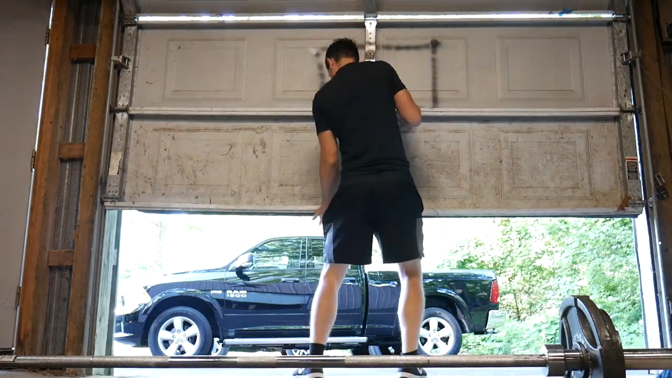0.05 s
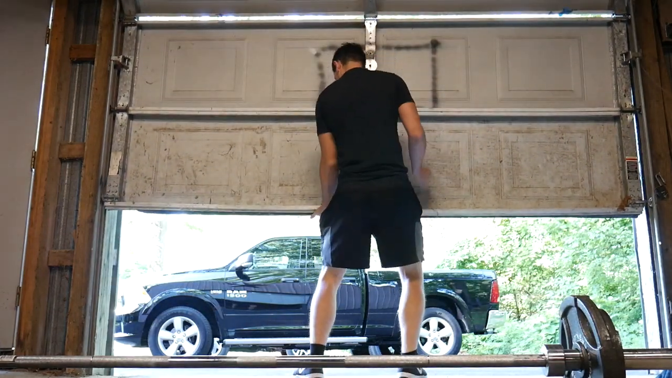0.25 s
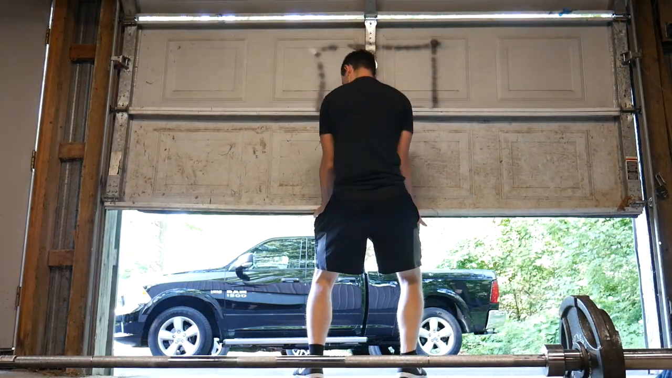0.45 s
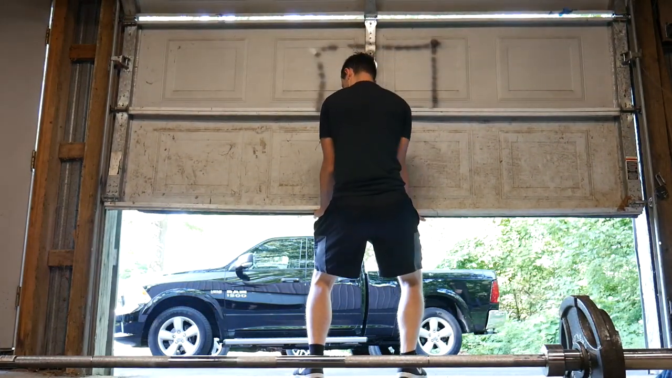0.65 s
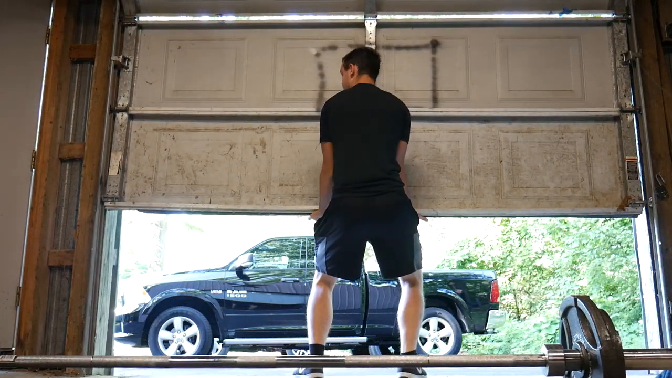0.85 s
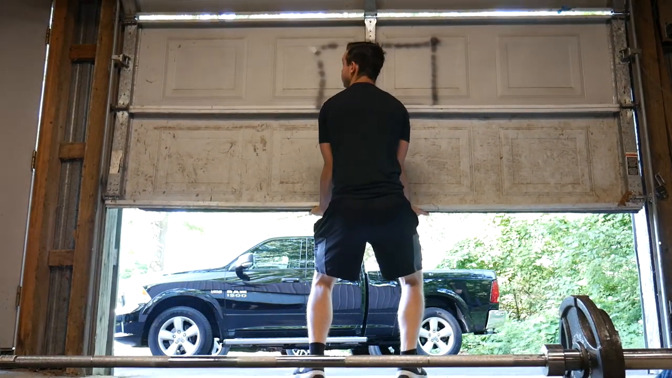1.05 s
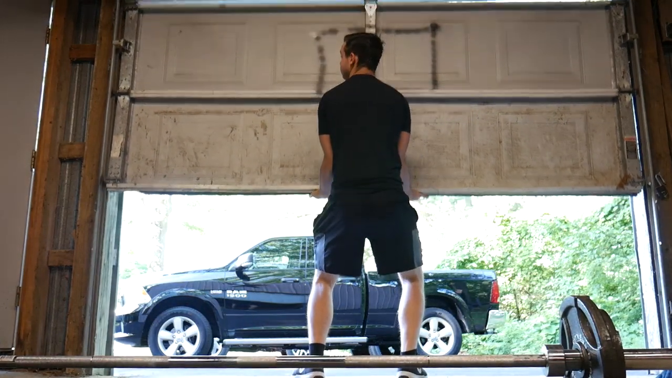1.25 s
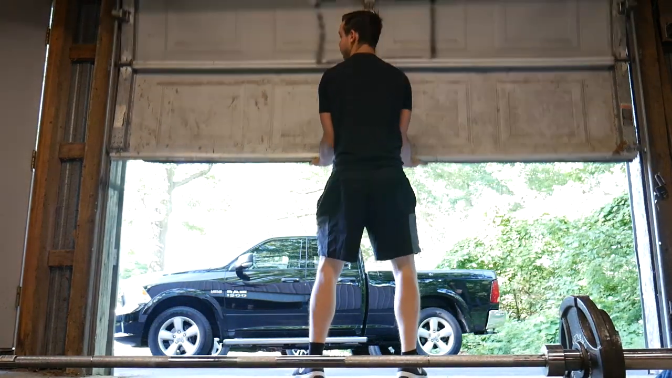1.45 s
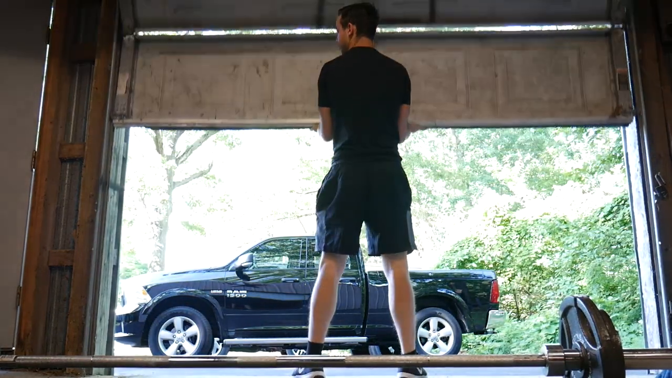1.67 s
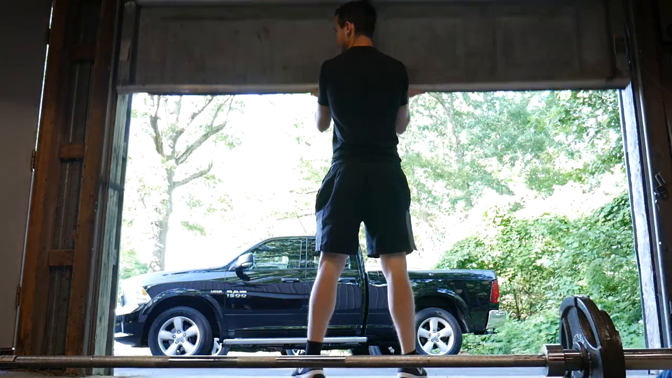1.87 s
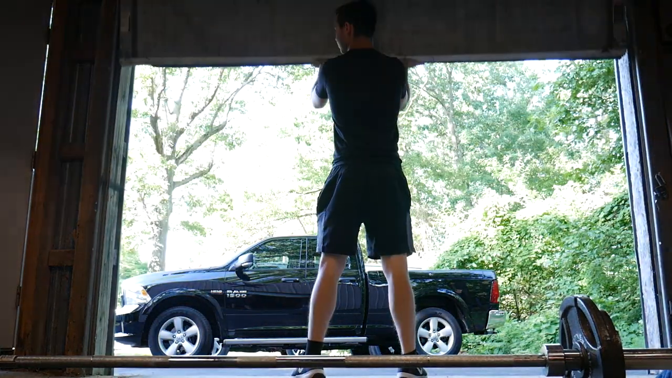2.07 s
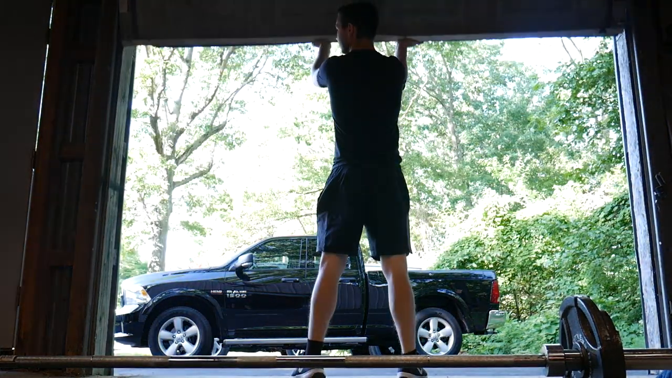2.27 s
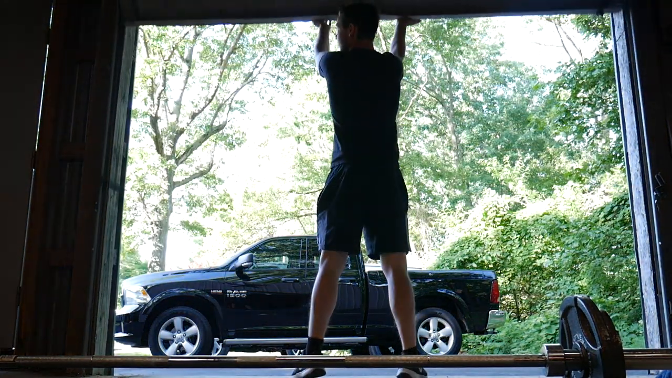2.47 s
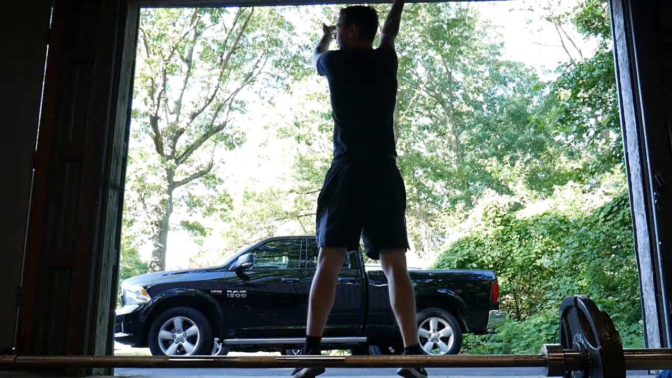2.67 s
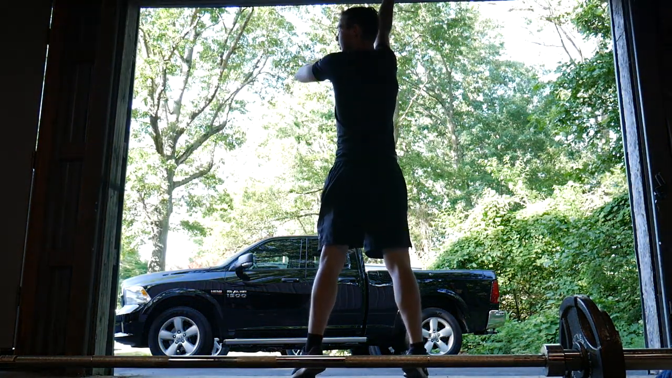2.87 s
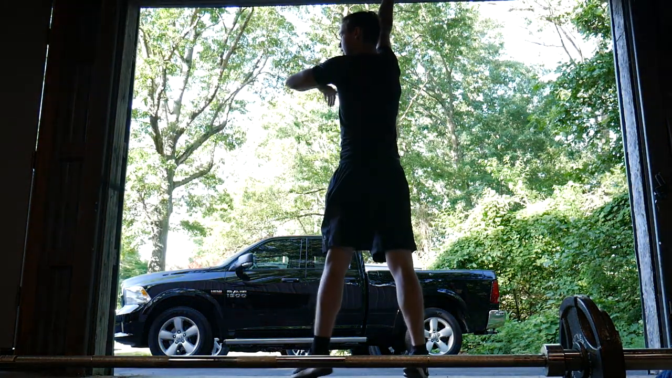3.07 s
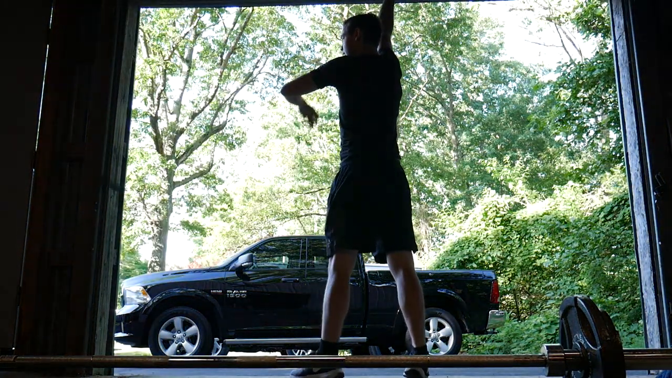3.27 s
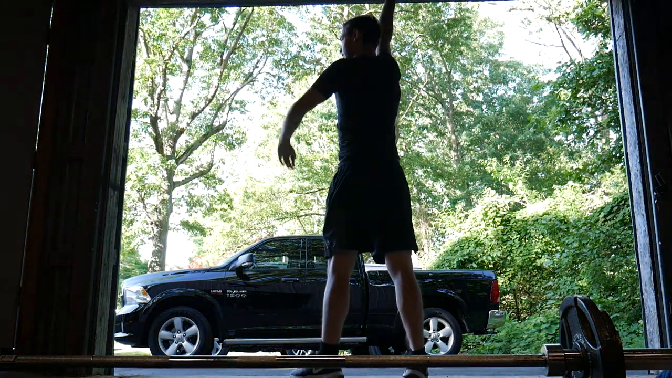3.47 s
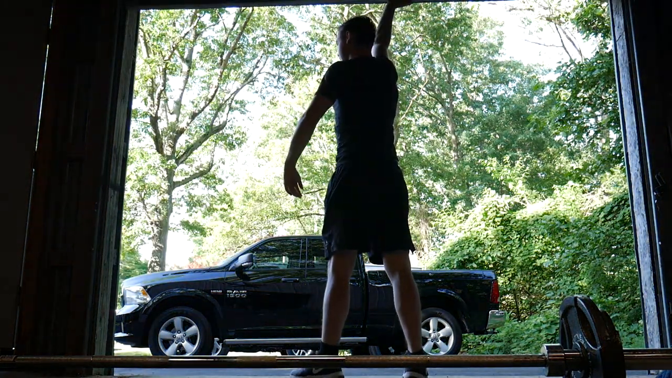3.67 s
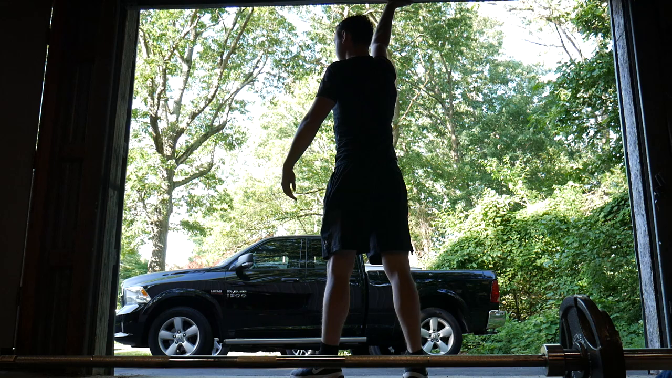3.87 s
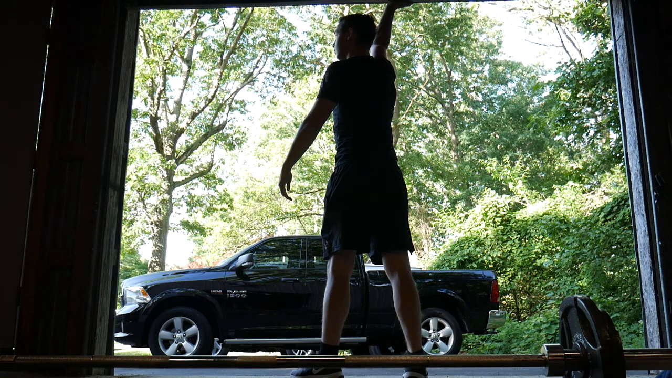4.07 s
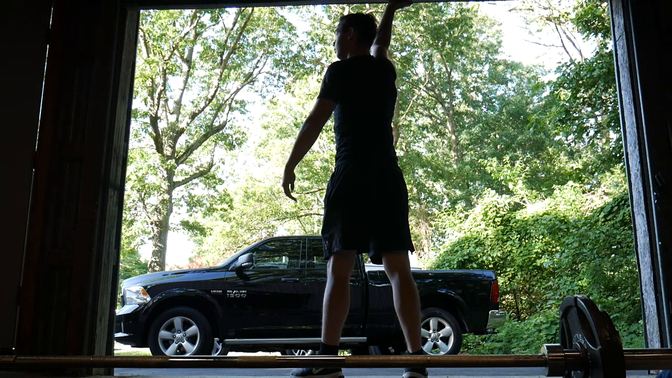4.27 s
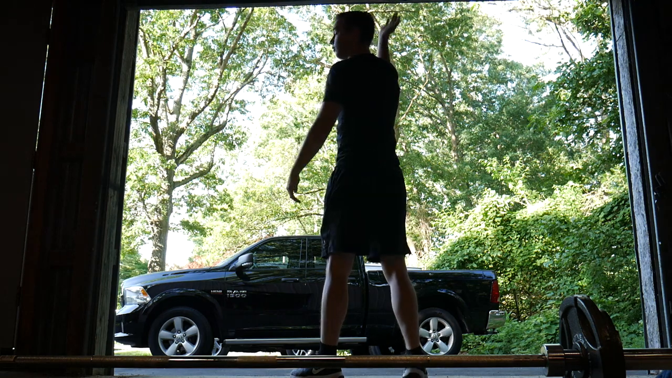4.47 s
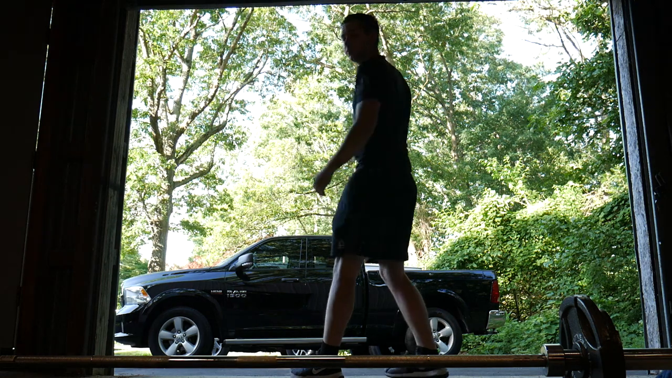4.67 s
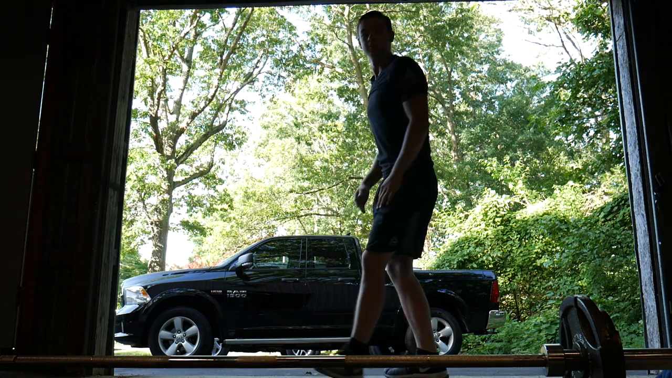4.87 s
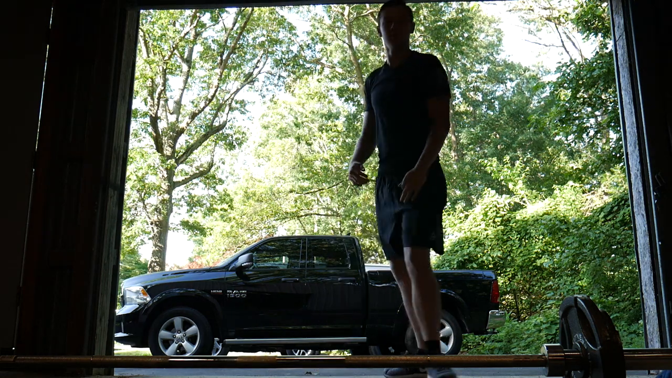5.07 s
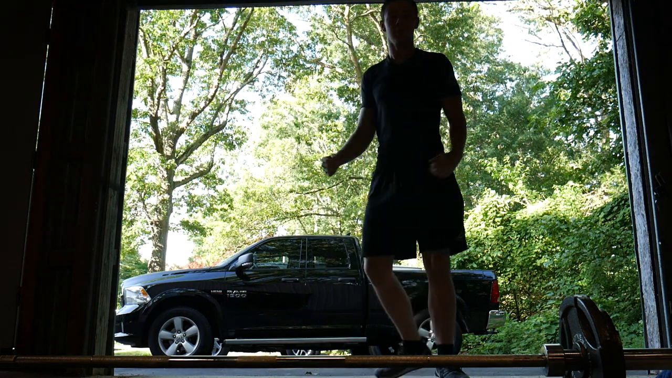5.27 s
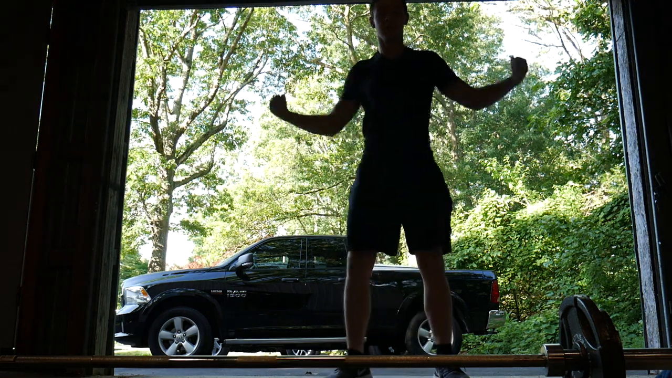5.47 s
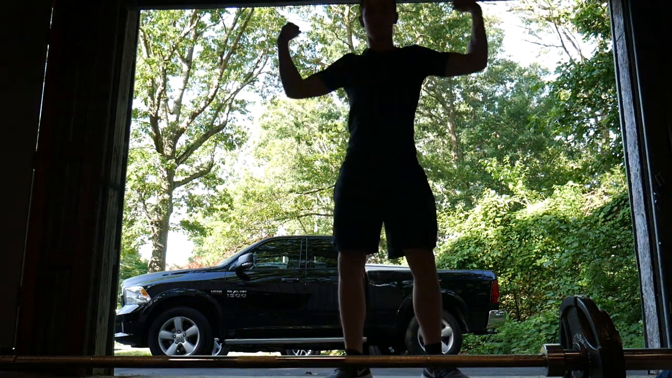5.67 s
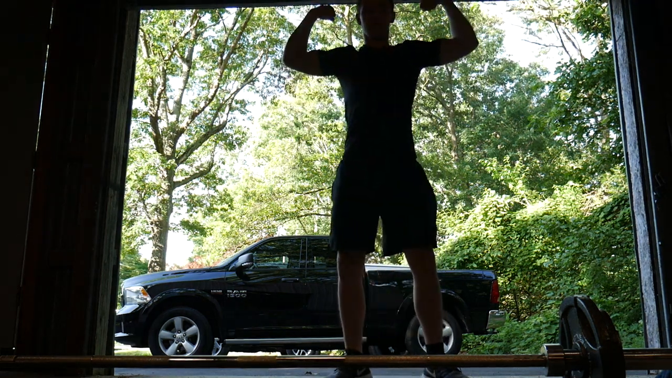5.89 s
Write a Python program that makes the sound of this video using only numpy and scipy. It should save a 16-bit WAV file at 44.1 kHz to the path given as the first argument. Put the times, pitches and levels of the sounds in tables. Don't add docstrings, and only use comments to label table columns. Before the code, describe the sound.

A steel sectional door is raised by hand in a bare, reverberant garage. From 0 to 1.1 s there are light rattles and small metallic clacks over a low, fading rumble. From about 1.2 s the rollers start hammering the tracks; the rumble grows, loudest around 1.5 to 2.1 s, with hard, bright hinge clacks at 1.5, 1.6, 1.8 to 1.9, 2.05, 2.2 and 2.55 s, the boom deepening as the panels swing overhead. At 2.75 s the door bangs its stop, and the bracket rings briefly. Softer bounces and ticks follow at 3.1 and 3.3 s, then dull panel thuds around 3.6 to 3.8 s with one last rocking rumble. It fades to faint outdoor hum by about 4.2 s. From 4.45 s tiny ticks lead into gritty shoe scuffs at 4.65, 5.2 and, strongest, 5.5 s, with dull heel thuds. The sound is close to mono, and the loudest peaks clip.

```python
import sys
import numpy as np
from scipy import signal
from scipy.fft import rfft, irfft, next_fast_len
from scipy.io import wavfile
from scipy.ndimage import uniform_filter1d

SR = 44100
rng = np.random.default_rng(int(sys.argv[2]) if len(sys.argv) > 2 else 0)


def invert_db(level):
    return 10 ** (np.asarray(level, dtype=float) / 20)


def transcribe(signal):
    frames = np.atleast_2d(signal).T
    limited = np.clip(frames, -1, 1)
    pcm = np.round(limited * 32767).astype(np.int16)
    wavfile.write(sys.argv[1], SR, pcm)


N = 261513
TIME = np.arange(N) / SR
SIZE = next_fast_len(N + SR)
HZ = np.arange(SIZE // 2 + 1) * SR / SIZE + 1e-3


def unit(x):
    return x / np.sqrt(np.mean(x ** 2))


def shape(points):
    hz, db = np.transpose(points)
    return invert_db(np.interp(np.log(HZ), np.log(hz), db))


def band(lo_hz, hi_hz):
    return np.sqrt(1 / (1 + (HZ / hi_hz) ** 6) - 1 / (1 + (HZ / lo_hz) ** 6) + 1e-12)


def humps(resonances):
    return invert_db(sum(db / (1 + (2 * (HZ - hz) / width) ** 2) for hz, width, db in resonances))


def colour(x, gain):
    return irfft(rfft(x, SIZE) * gain, SIZE)[:N]


def walk(rate):
    k = int(SR / rate)
    return uniform_filter1d(np.repeat(rng.standard_normal(N // k + 1), k), k)[:N]


def grit(per_s, spread_db):
    hit = rng.random(N) < per_s / SR
    size = np.minimum(rng.exponential(size=N), 3)
    return unit(hit * rng.standard_normal(N) * invert_db(spread_db * size))


def ring(x, hz, t60):
    radius = np.exp(-np.log(1000) / (t60 * SR))
    w = 2 * np.pi * hz / SR
    return signal.lfilter([np.sin(w)], [1, -2 * radius * np.cos(w), radius * radius], x)


def swell(s, length, rise):
    t = np.clip(TIME - s, 0, 1)
    return (1 - np.exp(-t / max(rise, 2e-4))) * np.exp(-(t / max(length, 1e-3)) ** 0.91)


def bursts(events, rises, drive, parts):
    power = np.zeros((3, N))
    for (s, db, body_db, edge_db, length), rise in zip(events, rises):
        levels = db - 7.0 + np.array([[body_db], [0], [edge_db]])
        power += (invert_db(levels) * swell(s, length, rise)) ** 2
    out = 0
    for p, part in zip(power, parts):
        out = out + colour(np.sqrt(p) * drive, part) / np.sqrt(np.mean(part ** 2))
    return out


def clacks(events, plate, ring_hz, ring_db):
    drive = grit(per_s=5000, spread_db=1.5)
    body = band(530, 1500) * shape([(500, -4), (900, -3.5), (1150, -4.5), (1500, -6)]) * plate
    middle = band(1550, 4020) * plate
    edge = band(6800, 16000) * shape([(5000, 10), (16000, -12.5)]) * plate
    blows = sum(swell(s, length, 0.00049) * invert_db(db + ring_db) for s, db, _, _, length in events)
    rung = ring(drive * blows, ring_hz, t60=0.01)
    return bursts(events, np.full(len(events), .0015), drive, (body, middle, edge)) + rung


# (frequency [Hz], t60 [s])
GARAGE_DECAY = [(150, 0.97), (500, 0.79), (1500, 0.41), (4000, 0.44), (9000, 0.2), (14000, 0.18)]


def garage(wet_db):
    t = np.arange(SR) / SR
    tail = 0
    hz = np.array(GARAGE_DECAY)[:, 0]
    edges = np.sqrt(hz[1:] * hz[:-1])
    for lo, hi, (_, t60) in zip([1, *edges], [*edges, SR], GARAGE_DECAY):
        fade = np.exp(-np.log(1000) * t / t60) * (1 - np.exp(-t / 0.0018))
        noise = rng.standard_normal(SR) * fade / np.sqrt(SR * 0.022)
        tail = tail + rfft(noise, SIZE) * band(lo, hi)
    tail = tail / np.sqrt(uniform_filter1d(np.abs(tail) ** 2, len(HZ) // 200))
    return (1 + invert_db(wet_db) * tail) / np.sqrt(1 + invert_db(2 * wet_db))


# (frequency [Hz], level [dB per Hz])
OUTDOOR_SPECTRUM = [(15, -25), (25, -13), (200, -9.5), (300, -1), (399, -10.5), (456, -8.5), (741, -17.5),
                    (969, -17), (1700, -20), (6370, -26), (10600, -34.5), (12500, -41), (15500, -33.5)]
OUTDOORS_DB = -53.5


def outdoors():
    noise = unit(colour(rng.standard_normal(N), shape(OUTDOOR_SPECTRUM)))
    return noise * invert_db(OUTDOORS_DB + 1.0 * walk(3.48))


# (time [s], level [dB], frequency [Hz])
HEEL_THUDS = [
    (4.65, -45, 343),
    (5.196, -46, 580),
    (5.199, -42, 250),
    (5.5, -42, 330),
]


def heels():
    out = 0
    for s, db, hz in HEEL_THUDS:
        t = np.clip(TIME - s, 0, 1)
        out = out + invert_db(db) * np.sin(2 * np.pi * hz * t) * t / 0.0015 * np.exp(-t / 0.005)
    return out


# (time [s], peak level [dB], frequency [Hz])
SMALL_TICKS = [(0.2785, -22.5, 2600), (1.509, -2.5, 4840), (1.8564, -16, 4660), (2.0424, -2, 5540),
               (2.209, -18, 4840), (2.38, -12.5, 9200), (2.3894, -25, 4570), (2.9288, -12, 4140),
               (3.0889, -18.5, 6860), (3.0887, -16, 5020), (3.1334, -18, 6790), (3.157, -24, 5220),
               (3.176, -26, 4440), (3.19, -23, 4640), (3.2036, -18, 7700), (3.5174, -27, 7570),
               (4.4333, -39, 5510), (4.441, -49, 4440), (4.4464, -41, 5170), (4.479, -42, 4720),
               (4.546, -39, 4430), (4.555, -38, 4740), (4.573, -36, 4190), (4.582, -31.5, 8000),
               (4.5913, -35, 7290), (5.4136, -39, 4100), (4.664, -17, 2600), (4.689, -21, 3000),
               (1.0834, -19, 3200)]


def ticks():
    out = 0
    for s, db, hz in SMALL_TICKS:
        t = np.clip(TIME - s, 0, 1)
        out = out + invert_db(db + 4.0) * np.sin(2 * np.pi * hz * t) * np.exp(-t / 0.00035)
    return out


# (time [s], peak level [dB], body level [dB], edge level [dB], drag [s])
SOLE_SCUFFS = [(4.571, -33.5, -9, -8, 0.014), (4.6438, -16, -15, -9, 0.01), (4.6603, -18, -5, -5, 0.0197),
               (4.689, -27.5, -6, -10, 0.026), (4.7286, -37.5, -21, 6, 0.028), (4.795, -38.5, -3, 5, 0.072),
               (4.8376, -34.5, -1, 8, 0.028), (4.863, -28, -7, 2.5, 0.016), (5.135, -48, -3, -5, 0.024),
               (5.168, -34, 8, 1.5, 0.024), (5.1946, -27, -30, -3, 0.016), (5.2353, -32, -10, -0.5, 0.02),
               (5.3044, -36.5, -3, -6, 0.014), (5.412, -42.5, -1, -6, 0.026),
               (5.4975, -18.5, 4.5, 0, 0.013), (5.5104, -10.5, -2, -8, 0.018), (5.5794, -28, -11, -9, 0.06),
               (5.6776, -27, -5, -16, 0.018)]
SOLE_RISE_S, SOLE_RISE_SHARE = 0.0035, 0.11


def shoes():
    body = band(660, 1380) * shape([(500, -0.5), (1200, 8), (1600, 8.5)])
    middle = band(1740, 5450) * shape([(1500, 1.4), (5000, -1.36)])
    edge = band(4000, 16000) * shape([(5000, 1), (8500, 8.5), (10000, -0.5), (16000, 0)])
    rises = SOLE_RISE_S + SOLE_RISE_SHARE * np.array(SOLE_SCUFFS)[:, -1]
    return bursts(SOLE_SCUFFS, rises, grit(per_s=9000, spread_db=-1.5), (body, middle, edge))


# (time [s], peak level [dB], body level [dB], edge level [dB], shake [s])
SETTLE_THUDS = [
    (3.5444, -29.5, 6, -21, 0.048),
    (3.6293, -15.5, 13, -21, 0.012),
    (3.638, -10, 7.5, -6, 0.023),
    (3.664, -10.5, 15, -1, 0.0034),
    (3.6994, -19, 3, -21, 0.011),
    (3.7433, -30.5, 12, -24, 0.013),
    (3.8082, -17, -2, -28, 0.015),
    (3.8494, -40, -1, -23, 0.014),
]
# (frequency [Hz], width [Hz], level [dB])
SETTLE_MODES = [(586, 250, -0.5), (895, 280, 4.5), (1120, 300, 9.5), (1490, 230, 3.5), (2160, 610, 6)]


def settling():
    return colour(clacks(SETTLE_THUDS, humps(SETTLE_MODES), 980, -22.0), garage(0.49))


# (time [s], peak level [dB], body level [dB], edge level [dB], shake [s])
STOP_BLOW = [
    (2.7472, 3.5, -9.5, -7.5, 0.027),
]
# (time [s], peak level [dB], body level [dB], edge level [dB], shake [s])
STOP_BOUNCES = [
    (3.0865, -20, 3, -1.5, 0.024),
    (3.2987, -17, 6, -1, 0.02),
]
# (frequency [Hz], width [Hz], level [dB])
STOP_MODES = [(1000, 400, 3), (1550, 400, 4), (2200, 900, 6), (2950, 500, 5), (3850, 400, 3),
              (4600, 700, 3), (7400, 700, 2)]
# (frequency [Hz], width [Hz], level [dB])
BOUNCE_MODES = [(1560, 200, 6.5), (2030, 200, 2.5), (2510, 300, 2), (3880, 300, 8), (4720, 270, 2),
                (7170, 300, -0.5)]


def stop():
    blow = clacks(STOP_BLOW, humps(STOP_MODES), 2200, -29.5)
    rebound = clacks(STOP_BOUNCES, humps(BOUNCE_MODES), 4400, -37.5)
    return colour(blow + rebound, garage(0.51))


# (frequency [Hz], level [dB], t60 [s])
BRACKET_MODES = [(991, -6, .4), (1502, -6, .25), (2015, 1, .3), (2210, -2, .1), (2918, -6, .3),
                 (3429, -11, .3), (3790, -3, .4), (3850, -5, .35), (4043, -7, .2), (4721, -8, .2),
                 (5475, -14, .4), (7526, -12, .25)]
BRACKET_DB, BRACKET_SHARE = -20.5, .85


def bracket():
    blow = np.zeros(N)
    for s, db, *_ in [*STOP_BLOW, *STOP_BOUNCES]:
        blow[int(s * SR)] = invert_db(BRACKET_SHARE * db)
    sung = sum(invert_db(db) * ring(blow, hz, t60) for hz, db, t60 in BRACKET_MODES)
    return colour(invert_db(BRACKET_DB) * sung, garage(-6))


# (time [s], peak level [dB], body level [dB], edge level [dB], shake [s])
HINGE_CLACKS = [(0.1328, -24.5, 6.5, -23, 0.078), (0.1804, -17, -14, -11, 0.015),
                (0.2776, -18, -7.5, -16, 0.016), (0.3087, -17.5, -1.5, -22, 0.017),
                (0.656, -22, -1, -7.5, 0.017), (0.991, -27, 8, -38.5, 0.012),
                (1.014, -21.5, 6.5, -40, 0.0089), (1.0833, -14.5, -3, -11.5, 0.019),
                (1.5075, -9, -7, -7.5, 0.039), (1.6086, -8.5, 1, -5.5, 0.012), (1.823, 0, -9, -15.5, 0.017),
                (1.858, -4.5, 4.5, 5, 0.0043), (1.8894, -7.5, 6.5, -18.5, 0.022),
                (2.0385, -4.5, -2.5, -13.5, 0.03), (2.0846, -2, -4.5, -19.5, 0.02),
                (2.209, -7.5, -9, -17.5, 0.016), (2.327, -24, -16.5, -25, 0.012),
                (2.383, -27.5, -17, -8, 0.011), (2.5582, -2, -9, -21, 0.012),
                (2.931, -25.5, -4.5, -21, 0.0069), (3.1314, -27, -2, 10, 0.0068),
                (3.174, -23.5, -33, -3, 0.014), (3.2044, -44, -18.5, 0, 0.02),
                (3.5074, -30.5, -28, -1, 0.018)]
HINGE_MODES = [1700, 3055, 2396]


def hinges():
    out = 0
    for k, hz in enumerate(HINGE_MODES):
        out = out + colour(clacks(HINGE_CLACKS[k::3], 1, hz, -31), garage(0.64))
    return out


# (time [s], roller load [dB], play of the rollers in the track [dB])
DOOR_PUSH = [(0.0, -32, 4.5), (0.17, -35, -15), (0.39, -37.5, -10.5), (0.6, -39, -14), (0.91, -44, -27.5),
             (1.05, -39.5, -13), (1.18, -31, -3.5), (1.32, -26, 3.5), (1.532, -20, 1), (1.67, -20, 1),
             (1.9, -17.5, -1), (2.1, -21.5, -0.5), (2.3, -25.5, -1), (2.7, -21.5, -4.5), (2.8, -27, -3),
             (3.04, -36, -3), (3.36, -47, 5), (3.56, -37.5, -10)]
LET_GO_DB_S = 55
LURCH_S, LURCH_DB, LURCH_RISE_S, LURCH_FADE_DB_S, LURCH_PLAY_DB = 3.69, -28.5, 0.17, 63.5, -0.5


def effort():
    s, load, play = np.transpose(DOOR_PUSH)
    push = np.interp(TIME, s, load) - LET_GO_DB_S * np.maximum(TIME - s[-1], 0)
    late = TIME - LURCH_S
    lurch = LURCH_DB - np.where(late > 0, LURCH_FADE_DB_S * late, -20 * late / LURCH_RISE_S)
    return np.maximum(push, lurch), np.where(lurch > push, LURCH_PLAY_DB, np.interp(TIME, s, play))


# (frequency [Hz], level [dB per Hz])
PANEL_SPECTRUM = [(18, -49.5), (30, -35.5), (156, -6.5), (284, -9), (323, -13), (388, -7.5), (708, -4.5),
                  (787, 2), (851, 0.5), (2910, -6), (5580, -14.5), (8940, -16), (15500, -27.5)]
# (frequency [Hz], width [Hz], level [dB])
PANEL_MODES = [(126, 26, 3.5), (168.7, 13, 5.5), (322, 15, 9), (500, 66, 0.5), (632, 33, 3.5), (796, 40, 3),
               (885, 70, -3.5), (1055, 80, -4.5), (1286, 230, -4), (2250, 80, 0), (5550, 71, 6.5)]


def rollers():
    out = 0
    for stretch in (.95, .99, 1.01, 1.06):
        steel = shape(PANEL_SPECTRUM) * humps(np.array(PANEL_MODES) * [stretch, 1, 1])
        knocks = grit(per_s=350, spread_db=3.0) * invert_db(4 * walk(6))
        out = out + colour(knocks, steel * garage(6.7))
    return out


BOOM_DB, BOOM_SHARE, BOOM_LAG_S = -14, 0.87, 0.026
HISS_DB, HISS_SHARE, HISS_PLAY, LURCH_HISS_DB = -9.5, 0.93, 0.15, -10
OVERHEAD_S, SWING_S, UPRIGHT_TILT_DB, FLAT_TILT_DB = 1.79, 0.18, 12.5, -11.5


def rolling():
    rumble = rollers()
    shudder = walk(20)
    uneven = .8 * walk(14)
    load, play = effort()
    boom = BOOM_DB + BOOM_SHARE * np.interp(TIME - BOOM_LAG_S, TIME, load)
    flat = (1 + np.tanh((TIME - OVERHEAD_S) / SWING_S)) / 2
    tilt = (UPRIGHT_TILT_DB + (FLAT_TILT_DB - UPRIGHT_TILT_DB) * flat) / 2
    rocking = np.clip((TIME - LURCH_S) * 10, 0, 1)
    hiss = HISS_DB + HISS_SHARE * load + HISS_PLAY * play + LURCH_HISS_DB * rocking
    layers = [(load, 430, 1120), (boom - 3 - tilt, 75, 230), (boom - 3 + tilt, 230, 430),
              (load + play, 1120, 5000), (hiss, 5000, SR)]
    out = 0
    for db, lo, hi in layers:
        heard = colour(rumble, band(lo, hi))
        heard = heard / np.sqrt(uniform_filter1d(heard ** 2, SR // 8))
        out = out + heard * invert_db(db + uneven + 0.49 * shudder + 0.86 * walk(25.1))
    frame = unit(colour(rng.standard_normal(N), band(24, 110) * HZ / 50))
    return out + frame * invert_db(-28.5 + 0.49 * boom)


def scene():
    door = hinges() + stop() + bracket() + settling()
    near = colour(shoes(), garage(-3.9)) + colour(ticks() + heels(), garage(-2))
    mono = door + near + rolling() + outdoors()
    return np.array([mono, mono])


def patches(cells, share, size, count):
    draw = rng.random((len(cells) // size + 1, cells.shape[1] // count + 1))
    draw = np.repeat(np.repeat(draw, size, axis=0), count, axis=1)
    return draw[:len(cells), :cells.shape[1]] < share[:, None]


JUMP_DB, MOST_JUMP_DB, RECOVER_DB_S = 5, 16, 55
LOUD_SHARE, QUIET_SHARE, QUIET_DB = .78, .5, -52


def apart(cells):
    db = 10 * np.log10(np.sum(np.abs(cells[50:400]) ** 2, axis=0) + 1e-12)
    rise = db - np.minimum(np.roll(db, 1), np.roll(db, 2))
    jump = np.r_[0, 0, 0, 0, rise[4:]]
    fall = RECOVER_DB_S * 1024 / SR * np.arange(len(db))
    calm = np.maximum.accumulate(np.minimum(jump, MOST_JUMP_DB) + fall) - fall < JUMP_DB
    return calm & (rng.random(len(db)) < np.where(db < QUIET_DB, QUIET_SHARE, LOUD_SHARE))


# (frequency [Hz], level [dB])
SIDE_TILT = [(60, 6), (250, 11), (800, 2.5), (2200, 8), (4000, 11.5), (6000, 13), (9000, 14), (14000, 20)]
APART_DB = -18


def spread(mono):
    frame = dict(window="cosine", nperseg=2048, noverlap=1024)
    lead = np.zeros(1024 - 643)
    hz, _, cells = signal.stft(np.r_[lead, mono], SR, **frame)
    cells = cells * ((hz < 15600) * np.minimum(hz / 60, 1))[:, None]
    lost = patches(cells, np.interp(hz, [8500, 10000, 15500], [0, .17, .38]), size=6, count=2)
    cells = cells * (1 - .95 * lost)
    kept = patches(cells, np.interp(hz, [1000, 8000, 15000], [.55, .6, .25]), size=24, count=1)
    tilt = np.interp(hz, HZ, shape(SIDE_TILT))[:, None]
    scrambled = cells * np.exp(2j * np.pi * rng.random(cells.shape))
    shadow = invert_db(-6.5) * scrambled * invert_db(APART_DB) * apart(cells) * kept * tilt
    mid, side = (signal.istft(c, SR, **frame)[1][len(lead):][:N] for c in (cells, shadow))
    return np.array([mid + side, mid - side])


def band_limit(x):
    return signal.sosfilt(signal.butter(12, 15620, fs=SR, output="sos"), x)


def record(dry):
    mix = np.clip(spread(np.clip(dry[0], -1, 1)), -1, 1)
    return band_limit(mix)


dry = scene()
out = record(dry)
transcribe(out)
```